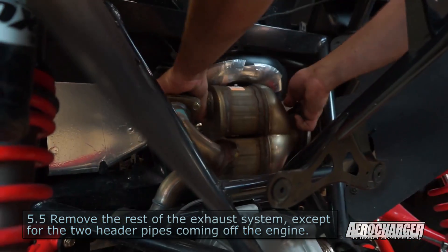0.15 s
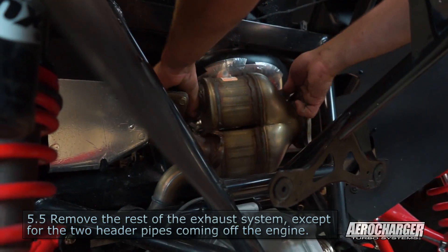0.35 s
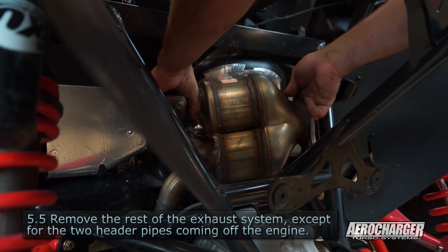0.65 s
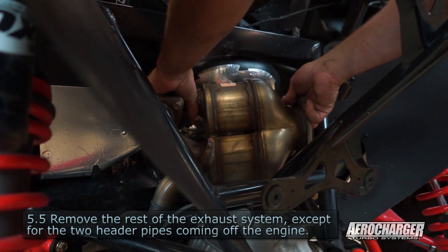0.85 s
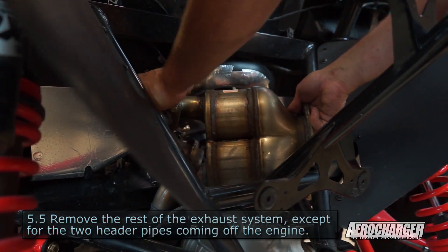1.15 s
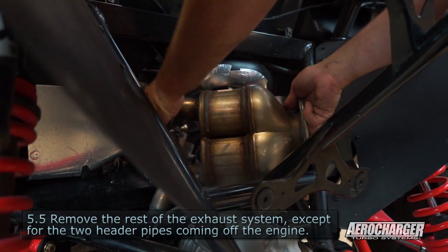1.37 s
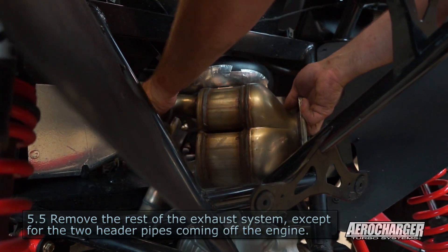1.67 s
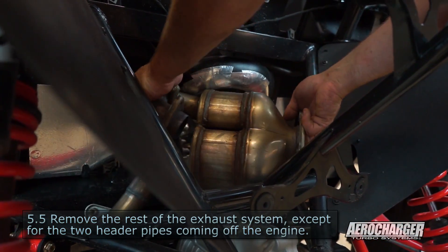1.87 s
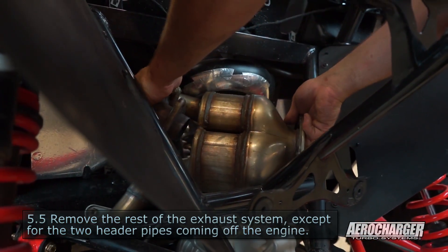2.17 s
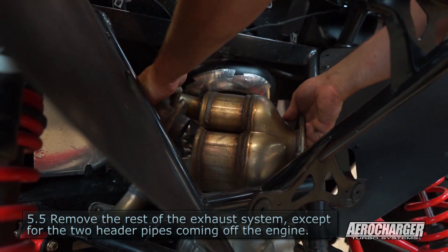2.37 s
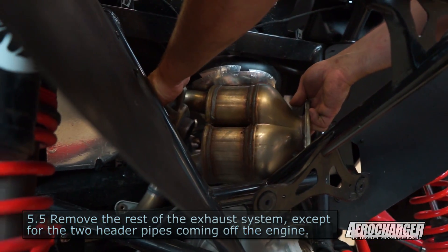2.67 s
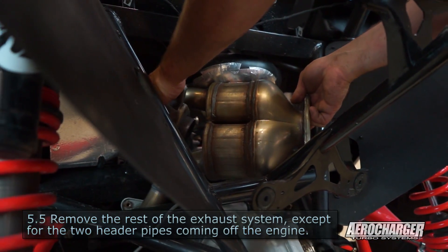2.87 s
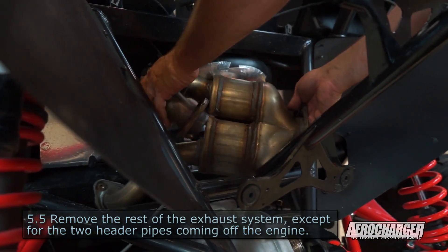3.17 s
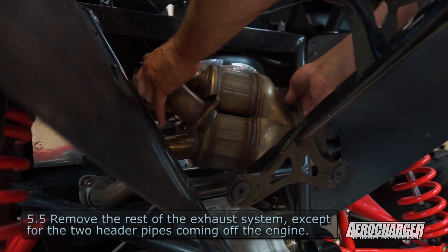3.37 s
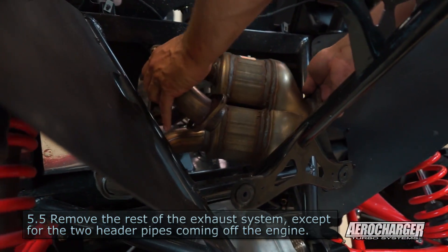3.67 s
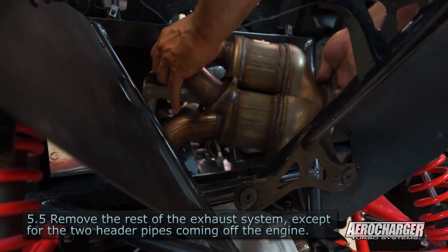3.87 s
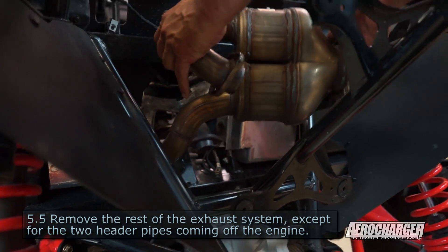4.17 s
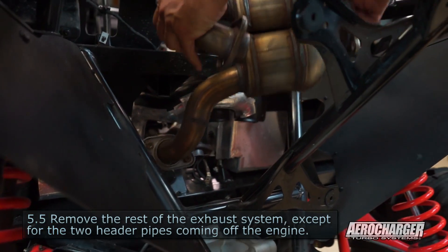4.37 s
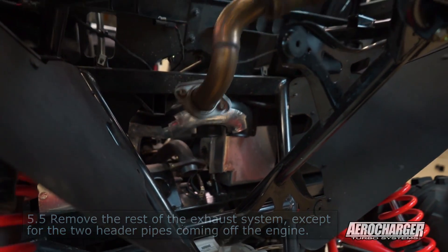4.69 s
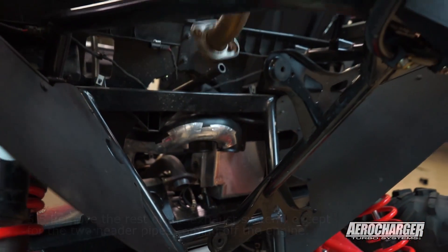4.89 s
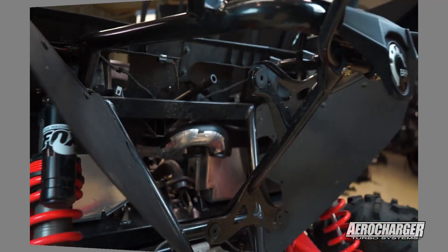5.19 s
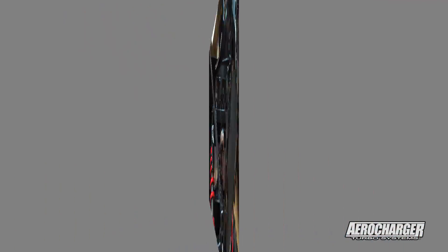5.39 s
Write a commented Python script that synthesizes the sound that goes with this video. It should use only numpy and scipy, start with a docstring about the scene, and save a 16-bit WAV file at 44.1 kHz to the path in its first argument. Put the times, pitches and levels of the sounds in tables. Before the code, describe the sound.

A close microphone in a garage picks up quiet, steady, low-weighted ventilation with a faint hum. At the start there are soft knocks and a grainy rub of hands and metal, then a firmer hollow knock near 0.5 s. After a short gap, muted knocks return around 0.95 to 1.2 s. From 1.5 s the steel clatters against the frame more busily, peaking in a heavy clank at about 1.85 s. Another weighty cluster comes at 2.4 to 2.5 s over sustained rubbing, followed by scattered knocks near 2.8 and 3.1 s. The sharpest, brightest strike lands at about 3.4 s, with a brief scraping chatter after it. From 3.75 s the contacts lighten: separate clinks at 3.75, 4.25 and 4.45 s, then a faint string of tinkles to about 5.15 s. A tiny dry tick at 5.2 s and a last small clink at 5.35 s leave only room air.

```python
"""Soft knocks and a grainy rub come first, over steady ventilation noise with a faint hum in a garage.
A steel exhaust with a twin-chamber muffler is worked loose by hand and lifted out through a tube frame:
it knocks and scrapes, then clinks more lightly as the free pipe end passes.
Modal synthesis: every contact force excites damped modes of steel and frame and a noise-like crowd of
weak modes; the place of contact sets which speak. Filtered noise makes the air, the rub and dry ticks."""
import sys
import numpy as np
from scipy import signal
from scipy.fft import rfft, irfft
from scipy.io import wavfile
from scipy.ndimage import uniform_filter1d

SR = 44100
rng = np.random.default_rng(int(sys.argv[2]) if len(sys.argv) > 2 else 0)


def dump_mix(stems):
    """Bounce the given channels to the path in sys.argv[1] as a 16-bit WAV at rate SR."""
    frames = np.atleast_2d(stems).T  # one column per channel
    limited = np.clip(frames, -1, 1)  # hard clip at full scale
    pcm = np.round(limited * 32767).astype(np.int16)
    wavfile.write(sys.argv[1], SR, pcm)


N = 243993


def undb(db):
    """Level to amplitude: 20 dB is a factor of ten."""
    return 10 ** (np.asarray(db) / 20)


def unit(x):
    """Normalisation to an rms amplitude of 1."""
    return x / np.sqrt(np.mean(x ** 2) + 1e-18)


def clock(count):
    """Uniform sampling: the times of count samples, in s."""
    return np.arange(count) / SR


def fade(t, t60):
    """Exponential damping: the amplitude is 60 dB down at t60."""
    return np.exp(-np.log(1000) * t / max(t60, 1e-3))


def band(x, lo, hi, order=4):
    """Causal band-pass filtering between lo and hi, in Hz."""
    return signal.sosfilt(signal.butter(order, [lo, min(hi, SR / 2 - 100)], "band", fs=SR, output="sos"), x)


def noise(points, count):
    """Spectral shaping of white noise through (f/Hz, level/dB) points on a logarithmic f axis."""
    hz, db = np.transpose(points)
    f = np.linspace(1, SR / 2, count // 2 + 1)
    gain = undb(np.interp(np.log(f), np.log(hz), db))
    return unit(irfft(rfft(rng.standard_normal(count)) * gain, count))


def add(out, x, start_s):
    """Linear superposition: x is summed into out from start_s."""
    i = max(0, int(start_s * SR))
    out[i:i + len(x)] += x[:len(out) - i]


# spectral density of the garage air, relative: (f/Hz, level/dB)
AIR_SPECTRUM = [(25, -4), (60, 0), (115, -2), (300, -11), (900, -19), (2000, -26), (6500, -31),
                (16000, -41)]
AIR_DB = -52


def air(hum_db=-62):
    """Stationary broadband noise: steady ventilation, plus a pure tone for the faint mains hum."""
    hum = unit(np.sin(2 * np.pi * 120 * clock(N)))
    return undb(AIR_DB) * noise(AIR_SPECTRUM, N) + undb(hum_db) * hum


# reverberation time of the garage: (f/Hz, t60/s)
REVERBERATION = [(120, 1.5), (260, 0.73), (700, 0.68), (2000, 0.4), (6000, 0.95), (14000, 0.28)]


def garage(x, wet_db=-15, bass_wet_db=-10, first_echo_s=0.017):
    """Diffuse reverberation: convolution with decaying noise; the bass is strongest and stays longest."""
    t = clock(SR)
    hz, t60 = np.transpose(REVERBERATION)
    tail = np.zeros(len(t))
    for lo in 62.5 * 2. ** np.arange(8):  # octave bands
        band_t60 = np.interp(np.log(lo * np.sqrt(2)), np.log(hz), t60)
        # silent until the first echo, then a linear rise of the same length
        decay = fade(t, band_t60) * np.clip(t / first_echo_s - 1, 0, 1)
        gain = undb(np.interp(lo, [125, 500], [bass_wet_db, wet_db]))
        tail += gain * band(rng.standard_normal(len(t)), lo, 2 * lo) * decay / np.sqrt(np.sum(decay ** 2))
    return signal.fftconvolve(x, tail)[:N]


# shoves of the hands: (t/s at which full strength is reached, length held/s, level/dB)
SHOVES = [(0, 0.092, -44.5), (0.95, 0.18, -42.5), (1.504, 0.053, -40.5), (1.837, 0.061, -56),
          (2.398, 0.92, -44), (3.616, 0.056, -43.5)]
SHOVE_ATTACK_S, SHOVE_T60_S = 0.119, 0.47


def effort():
    """Envelope of the driving force: each shove builds up, holds and dies away."""
    t = clock(N)
    strength = np.zeros(N)
    for s, length_s, db in SHOVES:
        rise = np.clip((t - s) / SHOVE_ATTACK_S + 1, 0, 1)
        strength += undb(db) * rise * fade(np.maximum(t - s - length_s, 0), SHOVE_T60_S)
    return strength


def shifting(grain_db=5, grain_samples=400):
    """Friction noise: a soft, grainy rub of hands and pipe moving in the frame."""
    steps = undb(grain_db * rng.standard_normal(N // grain_samples + 1))
    grains = uniform_filter1d(np.repeat(steps, grain_samples), grain_samples)[:N]
    colour = [(60, 1.5), (140, 5.0), (400, -8), (1000, -8), (3000, -17.5), (10000, -26.5), (16000, -38.5)]
    return effort() * unit(noise(colour, N) * grains)


# small dry ticks: (t/s, centre f/Hz, level before decay/dB, t60/s)
TICKS = [(2.274, 12000, -41, 0.022), (3.023, 11600, -42, 0.035), (3.046, 11000, -41, .04),
         (4.026, 9040, -50, 0.049), (4.120, 1800, -42, 0.031), (5.202, 11500, -41.5, .03)]


def ticks(width=1.25):
    """Damped narrow-band noise bursts: small dry ticks and faint clicks."""
    out, t = np.zeros(N), clock(SR // 8)
    for s, hz, db, t60 in TICKS:
        burst = unit(band(rng.standard_normal(len(t)), hz / width, hz * width, order=2))
        add(out, undb(db) * burst * fade(t, t60), s)
    return out


def thump(peak_db, thump_hz=31, thump_db=-7):
    """Damped low sine: a faint deep thump under each contact."""
    t = clock(SR // 3)
    return undb(peak_db + thump_db) * np.sin(2 * np.pi * thump_hz * t) * fade(t, .28)


# edges of the seven registers (thud, knock, clank, clink, ping, sizzle, edge): f/Hz
REGISTER_HZ = [90, 450, 1050, 2050, 3600, 5500, 10000, 16000]
# colour of a blow on shell and frame, relative within each register: (f/Hz, level/dB)
SHELL_COLOUR = [(90, -27.5), (135, -1), (200, -4.5), (380, -7.5), (600, -2), (1000, -8.5), (1280, -1.5),
                (1750, 1), (2050, -13), (3100, 2.5), (4400, -21), (5700, -24), (7000, -27), (9300, -27),
                (16000, -41)]


def crowds():
    """High modal overlap: countless weak modes merge into noise, one row per register."""
    dense = noise(SHELL_COLOUR, 4 * SR)
    return np.array([unit(band(dense, lo, hi)) for lo, hi in zip(REGISTER_HZ, REGISTER_HZ[1:])])


# Place columns: joint, flange rim, lower chamber, upper chamber, muffler edge, pipe bend, pipe, end flange.
# low, damped modes of the frame and its panels: (f/Hz, t60/s, then relative level/dB at each place)
FRAME_MODES = [(132, 0.3, -3, -2, -7, -6, -3, 0, -4, 0), (193, 0.26, -1, -5, -8, -2, 0, -2, -9, -3),
               (226, 0.22, -9, 0, -15, -7, -9, -3, -11, -11), (262, 0.22, -7, -9, -7, 0, -2, -7, -13, -7),
               (305, 0.2, -5, -7, -7, -3, -6, -8, -12, -14), (368, 0.2, -7, -5, -6, -1, -14, -10, -11, -13),
               (420, 0.18, -3, -6, -5, -3, -10, -9, -10, -16), (478, 0.18, -1, -2, -15, -6, -9, -8, -5, -6),
               (530, 0.16, -3, 0, -1, -9, 0, -9, -7, -12), (578, 0.16, 0, 0, 0, -7, -2, -8, -6, -9),
               (690, 0.16, -6, -3, -10, -2, -8, -5, -8, -17), (785, 0.16, -8, -5, -5, -4, -1, -2, 0, -11),
               (880, 0.14, -8, -9, -11, -17, -7, -6, -6, -11),
               (990, 0.14, -5, -7, -18, -6, -4, -10, -6, -10)]
# modes of the exhaust: (f/Hz, t60/s before the ring factor, then relative level/dB at each place)
STEEL_MODES = [(1191, 0.22, -4, -4, 0, -3, -9, -20, -14, -27), (1262, 0.2, -5, -9, -8, -7, 0, -8, -5, -12),
               (1288, 0.2, 0, -5, -3, 0, -5, -6, 0, -3), (1330, 0.2, -4, 0, -4, -1, -11, -17, -6, -4),
               (1558, 0.26, -18, -19, -13, -5, -11, -8, -6, -10),
               (1654, 0.32, -19, -10, -4, 0, -9, -14, -6, -1),
               (1792, 0.18, -15, -10, -12, -4, -9, -10, -18, -15),
               (1825, 0.25, -13, -10, -2, 0, -7, -15, -17, -13),
               (2234, 0.2, -12, -5, -13, -6, -19, 0, -9, -6),
               (2312, 0.25, -14, -26, -8, -10, -19, -9, -12, -3),
               (2425, 0.22, -20, -9, -12, -14, -21, -26, -22, -1),
               (2509, 0.28, -22, -15, -10, -12, -13, -31, -20, -4),
               (2885, 0.24, -20, -10, -17, -10, -7, -15, -17, -13),
               (2918, 0.24, -21, -12, -19, -10, -9, -5, -19, -19),
               (2965, 0.22, -22, -13, -11, -9, -11, -9, -18, -14),
               (3226, 0.2, -13, -19, -18, -14, -7, -17, -18, -26),
               (3292, 0.22, -11, -13, -19, -10, -10, -18, -18, -19),
               (3420, 0.2, -18, -22, -18, -13, -13, -22, -22, -30),
               (4240, 0.2, -25, -20, -19, -18, -12, -25, -27, -33),
               (4318, 0.22, -23, -9, -4, -10, -15, -26, -22, -22),
               (4392, 0.2, -28, -18, -18, -9, -12, -31, -27, -26),
               (4572, 0.3, -29, -4, -17, -9, -10, -19, -27, -25),
               (4986, 0.34, -32, -14, -17, -22, -19, -35, -40, -28),
               (5026, 0.36, -31, -30, -14, -20, -18, -19, -35, -38),
               (6510, 0.22, -27, -29, -21, -22, -21, -18, -43, -22),
               (6594, 0.36, -27, -30, -12, -21, -29, -21, -35, -29),
               (6705, 0.26, -23, -19, -22, -18, -18, -20, -38, -26),
               (7985, 0.25, -33, -31, -33, -27, -19, -26, -38, -43),
               (8470, 0.24, -30, -26, -23, -19, -22, -35, -39, -39),
               (9495, 0.35, -40, -23, -26, -27, -21, -28, -36, -48)]


def modes(t, place, ring, twin_db=-16, twin_ring=0.69, twin_split=.003):
    """Modal degeneracy split: the shell is not quite round, so each steel mode beats against a weak twin."""
    rows = []
    for hz, t60, *place_db in FRAME_MODES:
        rows.append(undb(place_db[place]) * np.sin(2 * np.pi * hz * t) * fade(t, t60))
    for hz, t60, *place_db in STEEL_MODES:
        phase = 2 * np.pi * hz * t
        split = twin_split * rng.standard_normal()
        twin = undb(twin_db) * np.sin(phase * (1 + split)) * fade(t, t60 * ring * twin_ring)
        rows.append(undb(place_db[place]) * (np.sin(phase) * fade(t, t60 * ring) + twin))
    return np.array(rows)


def contact(length_s, slips_per_s=700, spread_db=5, slip_db=-9, glancing_s=0.017):
    """Stick-slip excitation: a first blow, then uneven slips while steel drags over steel."""
    count = int(max(length_s, .002) * SR)
    slips = rng.random(count) < slips_per_s / SR
    scatter = np.clip(rng.standard_normal(count), -2, 2)
    force = slips * rng.choice([-1, 1], count) * undb(slip_db + spread_db * scatter)
    # a brief tap rebounds cleanly and hardly drags
    force *= min(1, length_s / glancing_s) ** 2
    force[0] = 1
    return force


# crowd of weak modes in each register: (level re clear modes/dB before blow and place offsets, t60/s)
CROWD = [(-1.5, 0.23), (4, 0.17), (-7.5, 0.16), (-11, 0.36), (-3, 0.17), (2.5, 0.18), (20, 0.047)]


def knock(t, length_s, levels_db, rings, crowd, place_crowd_db,
          spill=0.083, firm_db=-23, scatter_db=3.5, build_cycles=0.31, settle_s=0.012):
    """Modal superposition: one force rings the clear modes and the crowd of weak modes between them."""
    force = contact(length_s)
    start = rng.integers(crowd.shape[1] - len(t))
    # no two contacts land on quite the same spot
    weights = rng.choice([-1, 1], len(rings)) * undb(scatter_db * rng.standard_normal(len(rings)))
    edges = np.searchsorted([row[0] for row in [*FRAME_MODES, *STEEL_MODES]], REGISTER_HZ)
    # a hard blow spills more of its energy into the crowd; a light tap rings purer
    hard_db = spill * (max(levels_db) - firm_db)
    bodies = []
    for lo, hi, dense, (crowd_db, t60) in zip(edges, edges[1:], crowd[:, start:start + len(t)], CROWD):
        clear = unit(weights[lo:hi] @ rings[lo:hi])
        weak = unit(dense * fade(t, t60))
        bodies.append(clear + undb(crowd_db + hard_db + place_crowd_db) * weak)
    # bending waves need a moment to spread over the shell, the low ones longest
    bodies = np.array(bodies) * (1 - np.exp(-np.outer(REGISTER_HZ[:-1], t) / build_cycles))
    # each register's level is the rms over the contact and a short settling time
    count = len(force) + int(settle_s * SR)
    attack = signal.fftconvolve(bodies[:, :count], force[None], axes=1)[:, :count]
    gains = undb(levels_db) / np.sqrt(np.mean(attack ** 2, axis=1))
    return signal.fftconvolve(gains @ bodies, force)


# knocks and scrapes in the frame:
# (t/s, chatter time/s, level/dB before voicing, heft/dB = weight behind it, bite/dB = edge sharpness)
KNOCKS = [(0, 0.013, -39, 6.5, 2.5), (.127, 0.021, -40.5, 1, -3), (0.38, 0.023, -49, 17, 0.5),
          (.44, 0.048, -34.5, 4, -3.5), (.483, 0.02, -24.5, -1.5, -0.5), (0.952, 0.0074, -26, -5.5, -6.5),
          (.975, 0.021, -32, 0.5, -7), (1.127, 0.0086, -33, -10, -2), (1.172, 0.0048, -39.5, 1.5, -22),
          (1.231, 0.026, -48, 10, -1), (1.404, .014, -39.5, -14, -4.5), (1.501, .025, -33, 3.5, -2),
          (1.524, 0.032, -29, 3, 7), (1.629, .0025, -29, -11, 2.5), (1.736, 0.05, -50, 11, 11),
          (1.778, .025, -31, -16, -0.5), (1.803, 0.021, -25.5, 12.5, 5), (1.838, .015, -17.5, 2.5, 5),
          (1.868, 0.023, -25, -1.5, 3.5), (1.901, 0.027, -25, -3, 8), (2.178, 0.0031, -31, -6.5, -10),
          (2.234, 0.012, -39, 16, -0.5), (2.286, 0.007, -29, -2.5, -3.5), (2.4319, 0.019, -23.5, 12, 8),
          (2.467, 0.01, -24.5, -3.5, 9), (2.497, 0.051, -30.5, 1, -0.5), (2.597, 0.0068, -32, -7, 1),
          (2.787, 0.0021, -30, -2, 7), (2.809, .013, -25.5, 5.5, 0), (2.83, 0.012, -28.5, -6.5, 10.5),
          (2.89, 0.0074, -39, 0.5, 4), (2.987, 0.01, -39.5, -4, -0.5), (3.016, 0.022, -36, 7, 2.5),
          (3.06, 0.024, -27.5, -2.5, 0), (3.09, 0.026, -50, 16.5, 7), (3.164, 0.015, -34, -10, -0.5),
          (3.249, 0.046, -46, 13, 2.5), (3.306, 0.014, -34.5, -11, -6.5), (3.372, .011, -36.5, 1, -8),
          (3.3857, 0.007, -15, -13, 11.5), (3.408, 0.022, -21.5, -7.5, 9.5), (3.436, 0.03, -31, -3, 6),
          (3.476, .029, -27.5, -15.5, -4), (3.584, 0.042, -41, -30, -5), (3.606, 0.0026, -30.5, 7, 6),
          (3.624, .013, -48.5, 24, -11), (3.665, 0.035, -48.5, 22.5, -8)]
# answer of each register to a knock: (level/dB, share of the heft, share of the bite)
KNOCK_VOICE = [(-9, 1, 0.12), (-5, 0.63, 0), (0.5, 0.069, 0.034), (-6, 0, 0.18), (-12, 0.13, 0.95),
               (-16.5, 0, 0.92), (-26.5, 0.12, 1)]
# clinks of the free pipe, no weight behind them: (t/s, chatter time/s, level/dB before voicing, bite/dB)
CLINKS = [(3.753, 0.0086, -31.5, 8.5), (4.237, 0.0035, -31.5, 5.5), (4.429, 0.0018, -34, -4),
          (4.512, 0.012, -36.5, -9.5), (4.591, .013, -37, -9.5), (4.622, 0.0069, -41, -8),
          (4.685, 0.0086, -42.5, -4), (4.709, 0.0087, -43, -8), (4.73, .006, -37, -9.5),
          (4.918, 0.039, -42.5, -4.5), (4.957, .011, -42.5, -14), (4.98, 0.015, -38, -9.5),
          (5.059, 0.018, -49.5, -15), (5.143, 0.0055, -48.5, -30), (5.336, 0.0073, -37, 1)]
# answer of each register to a clink: (level/dB, share of the bite)
CLINK_VOICE = [(-34, 0), (-12.5, 0), (0, 0.084), (-1.5, 0.74), (-15.5, 0.94), (-17, 1), (-24, 0.32)]
# candidate rattles per second, their chatter in s, level re the shove and half-range of scatter in dB
RATTLES_PER_S, RATTLE_S, RATTLE_DB, RATTLE_SCATTER_DB = 11, 0.029, -6, 2


def contacts(faintest_db=-60):
    """Impact spectrum: heft brings out the bass, bite the treble; gives (t/s, chatter/s, register levels/dB)."""
    knock_db, by_heft, by_bite = np.transpose(KNOCK_VOICE)
    events = []
    for s, length_s, db, heft, bite in KNOCKS:
        events.append((s, length_s, db + knock_db + heft * by_heft + bite * by_bite))
    clink_db, by_bite = np.transpose(CLINK_VOICE)
    for s, length_s, db, bite in CLINKS:
        events.append((s, length_s, db + clink_db + bite * by_bite))
    # light rattles at random times, kept only where the shoving is strong enough
    shove_db = 20 * np.log10(effort() + 1e-9)
    for when, strength in rng.random((int(RATTLES_PER_S * N / SR), 2)):
        db = shove_db[int(when * N)] + RATTLE_DB + RATTLE_SCATTER_DB * (2 * strength - 1)
        if db > faintest_db:
            events.append((when * N / SR, RATTLE_S, db + knock_db))
    return events


# places of contact in turn, in the order of the mode tables' place columns:
# choked while seated, long and pure once the pipe hangs free
# (touched from t/s, factor on the steel t60, offset of the crowd level/dB)
PLACES = [(-1.5, 0.65, 1.5), (1.21, 0.54, -1), (1.74, 0.58, -1.5), (2, 0.64, -1.5), (3, 0.66, -0.5),
          (3.5, 0.82, -3), (4.5, 0.91, -4.5), (5.5, 1.15, -8)]


def exhaust(radiate_hz=110, sudden_s=.012):
    """Structure-borne sound and its radiation: all contacts, from the joint along the muffler to the free pipe."""
    knocks, thumps = np.zeros(N), np.zeros(N)
    t, crowd = clock(SR // 2), crowds()
    rings = [modes(t, place, ring) for place, (_, ring, _) in enumerate(PLACES)]
    for s, length_s, levels_db in contacts():
        place = sum(s >= start for start, _, _ in PLACES) - 1
        add(knocks, knock(t, length_s, levels_db, rings[place], crowd, PLACES[place][2]), s)
        # a sudden blow thumps more strongly than a long scrape
        add(thumps, thump(max(levels_db)) / (1 + length_s / sudden_s), s)
    # thin tubes and panels radiate little deep bass
    return band(knocks, radiate_hz, SR / 2, order=3) + thumps


def scene():
    """Direct plus reverberant field: the work heard from close by in the garage, over its steady air."""
    still = air()
    work = ticks() + shifting() + exhaust()
    return (work + garage(work) + still)[None]


TOP_HZ = 15900


def record(dry):
    """Soft saturation rounds the highest peaks; an elliptic low-pass cuts the top."""
    rounded = 2 * np.tanh(dry / 2)
    return signal.sosfilt(signal.ellip(8, .2, 70, TOP_HZ, fs=SR, output="sos"), rounded)


dry = scene()
out = record(dry)
dump_mix(out)
```